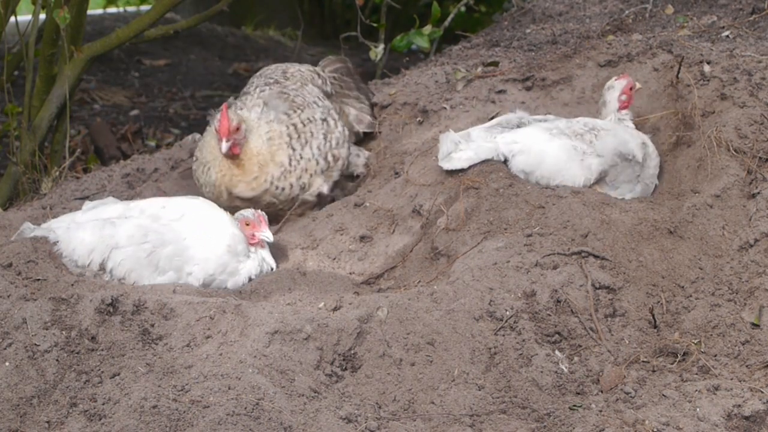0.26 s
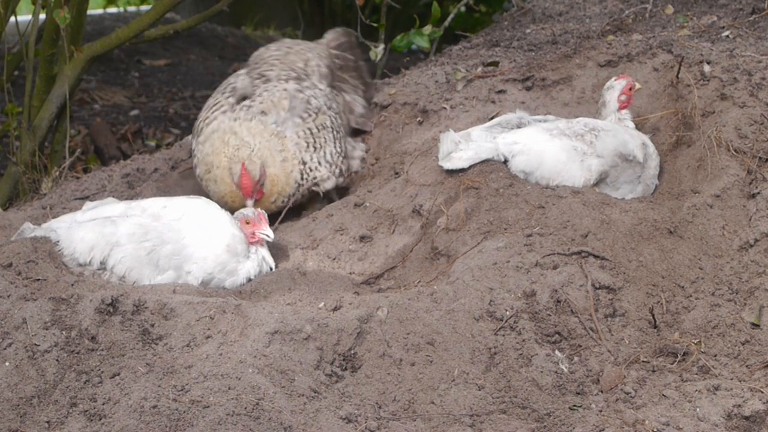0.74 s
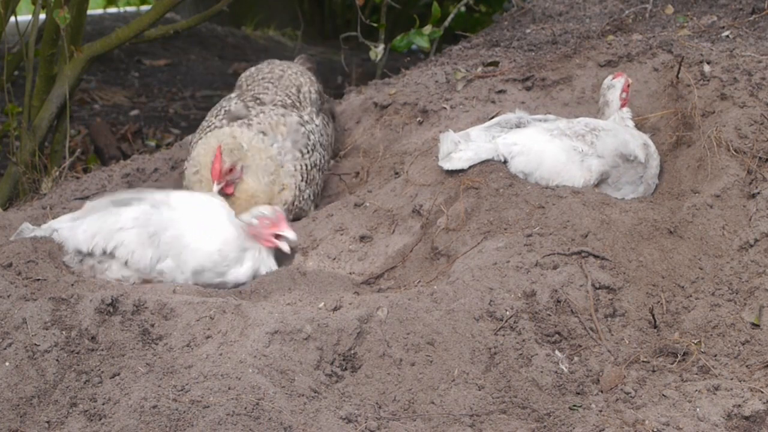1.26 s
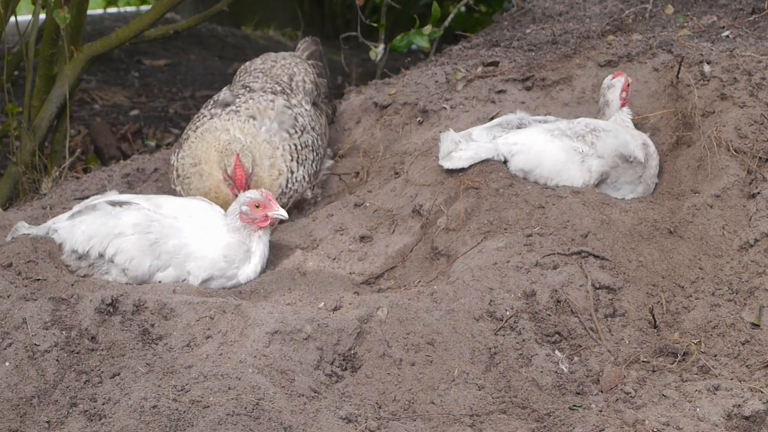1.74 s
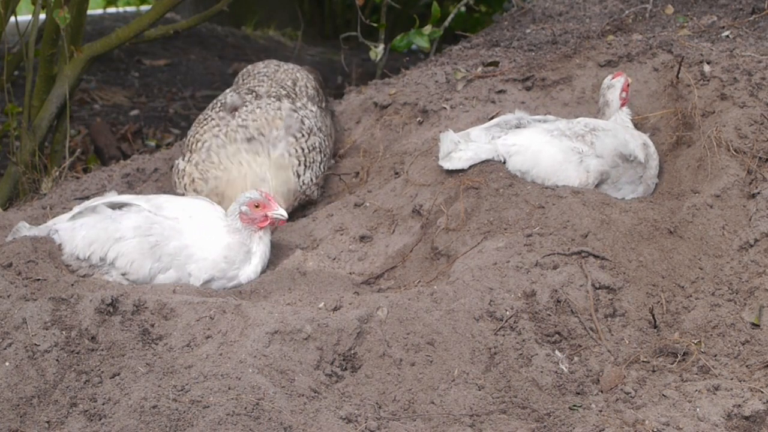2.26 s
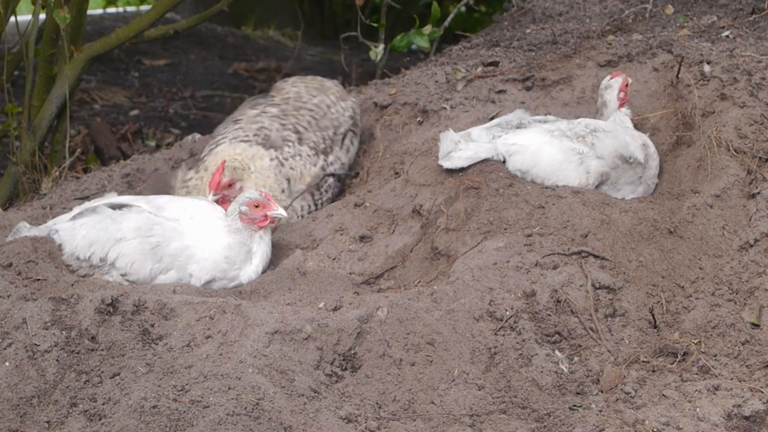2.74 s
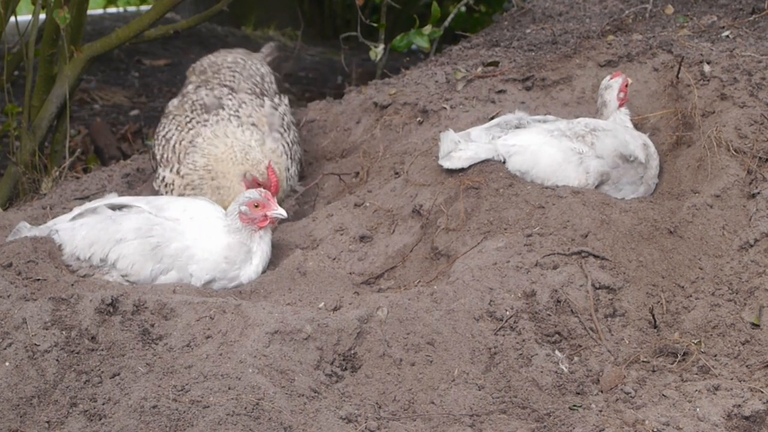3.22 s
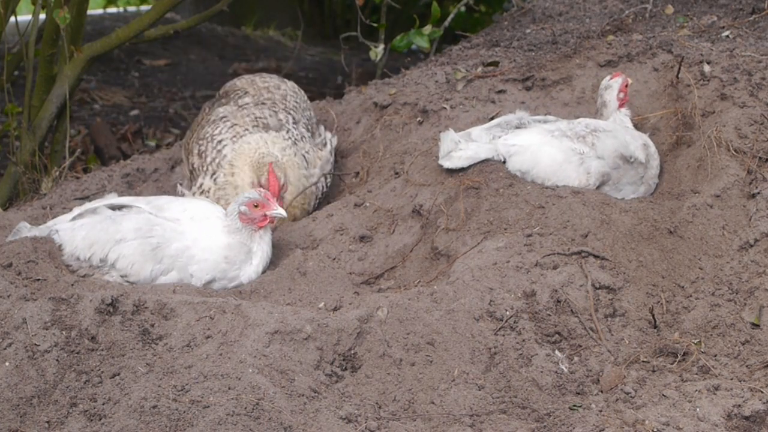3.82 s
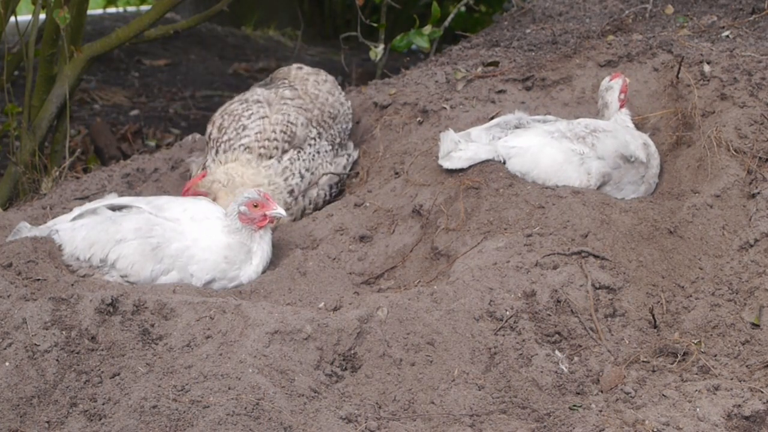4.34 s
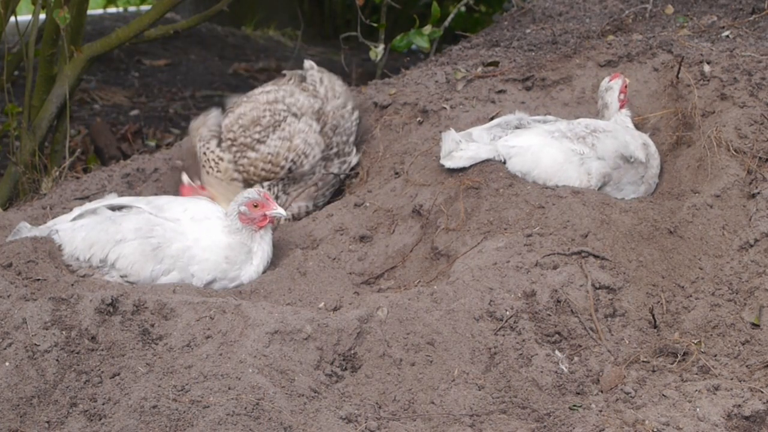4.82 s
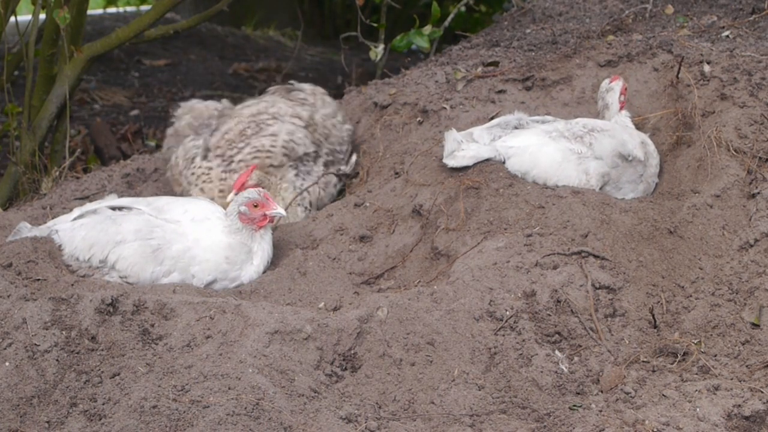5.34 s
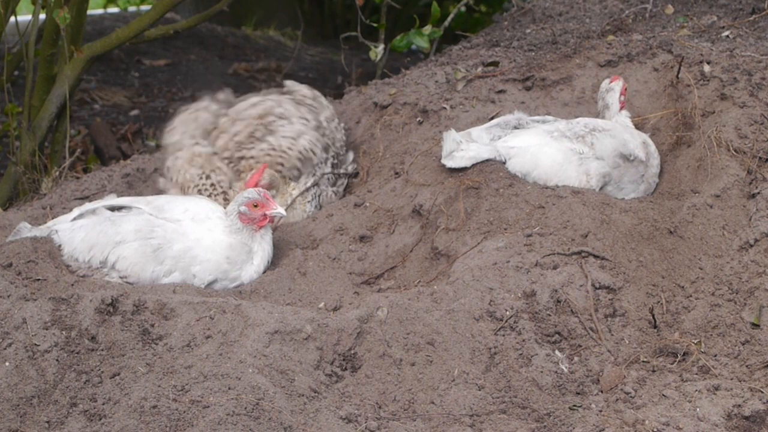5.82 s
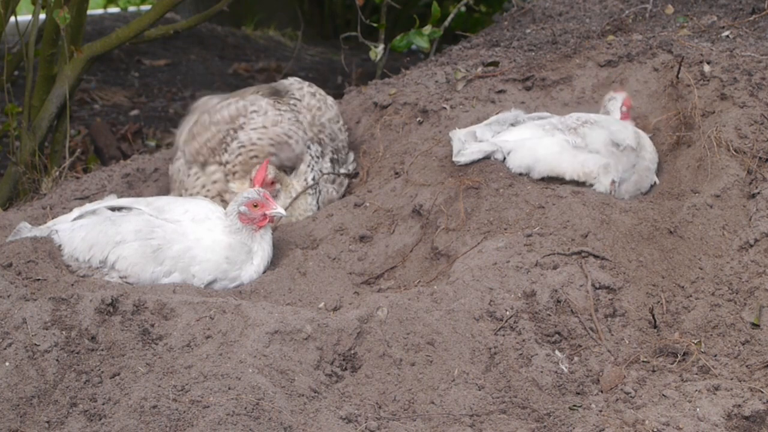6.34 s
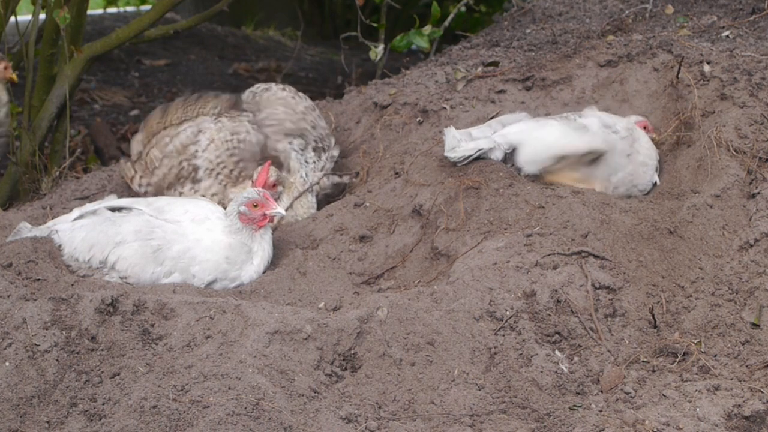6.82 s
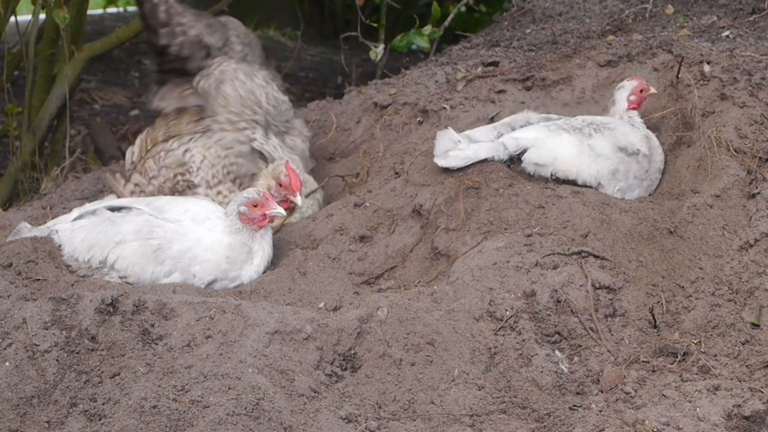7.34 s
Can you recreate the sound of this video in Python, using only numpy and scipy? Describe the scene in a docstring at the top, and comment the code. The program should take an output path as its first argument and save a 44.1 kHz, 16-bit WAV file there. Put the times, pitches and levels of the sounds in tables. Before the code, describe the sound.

A hen croons and mutters while another bird yelps, whistles and screams once; later come quiet clucking, sandy rustles and a short rough squawk.

```python
"""A sandy poultry run outdoors: birds dust-bathe close by, under a faint hiss of air.
A hen croons and clucks low; a shriller bird yelps, flips into thin whistles and screams once.
Later comes a hoarse squawk. Feathers shuffle in the sand and a far bird calls in falling notes.
Calls are harmonics plus breath noise shaped by a throat; air and sand are filtered noise.
Echoes and a scattered tail place the sounds in the yard."""
import sys
import numpy as np
from scipy import signal
from scipy.fft import rfft, irfft, next_fast_len
from scipy.io import wavfile
from scipy.ndimage import uniform_filter1d, minimum_filter1d

SR = 44100
rng = np.random.default_rng(int(sys.argv[2]) if len(sys.argv) > 2 else 0)


def master(y):
    """Save y as 16-bit WAV."""
    cut = np.clip(np.atleast_2d(y).T, -1, 1)
    pcm = np.round(cut * 32767)  # scale
    wavfile.write(sys.argv[1], SR, pcm.astype(np.int16))


N = 333837  # samples
EDGE_HZ = 15650  # top of the audible band
EDGE_DB = 10  # a held call starts and ends this far below its level
BREAK_S = 0.0013697  # time scale of a break between registers


def amp(db):
    """Decibels to gain."""
    return 10 ** (np.asarray(db) / 20)


def unit(x):
    """Scales to rms 1."""
    return x / np.sqrt(np.mean(x ** 2) + 1e-20)


def read(points, hz):
    """Reads a (frequency_hz, value) table on a log-frequency axis."""
    table_hz, value = np.transpose(points)
    return np.interp(np.log(hz + 1), np.log(table_hz + 1), value)


def add(mix, start_s, sound):
    """Mixes a sound in at its start time."""
    part = mix[max(round(start_s * SR), 0):][:len(sound)]
    part += sound[:len(part)]


def tint(x, points):
    """Filters by a (frequency_hz, gain_db) table."""
    size = next_fast_len(len(x) + 1024)
    gain = amp(read(points, np.fft.rfftfreq(size, 1 / SR)))
    return irfft(rfft(x, size) * gain, size)[:len(x)]


def wander(count, hz):
    """Smooth random drift of rms 1, changing about hz times a second."""
    pole = np.exp(-2 * np.pi * hz / SR)
    noise = rng.standard_normal(count + 2048)
    return unit(signal.lfilter([1], np.poly([pole, pole]), noise)[-count:])


def timeline(first_s, last_s, count=240):
    """Evenly spaced moments."""
    return np.linspace(first_s, last_s, count)


def blend(a, b, share):
    """Goes from a to b as share goes from 0 to 1."""
    return a + (b - a) * share


def contour(s, hz, db, rough):
    """The controls of one call, as rows of (time_s, pitch_hz, level_db, roughness)."""
    return np.column_stack(np.broadcast_arrays(s, hz, db, rough))


def held(t, length_s, attack_s, release_s):
    """Attack, hold and release as an envelope in dB."""
    attack = np.maximum(1 - t / attack_s, 0)
    release = np.maximum(1 - (length_s - t) / release_s, 0)
    return -EDGE_DB * (attack + release)


def broken(t):
    """How far (0-1) the voice has moved into its other register, t seconds from the break."""
    return .5 + .5 * np.tanh(t / (2 * BREAK_S))


def note(start_s, length_s, first_hz, last_hz, db, rough, attack_s, release_s):
    """A held note whose pitch glides in a straight line."""
    t = timeline(0, length_s)
    hz = blend(first_hz, last_hz, t / length_s)
    return contour(start_s + t, hz, db + held(t, length_s, attack_s, release_s), rough)


def throat_response(points, size=4096):
    """Complex response of a throat: its gain, with the phase of a causal ring."""
    log_gain = np.log(amp(read(points, abs(np.fft.fftfreq(size, 1 / SR)))))
    response = np.exp(np.conj(signal.hilbert(log_gain)))
    return np.fft.rfftfreq(size, 1 / SR), response[:size // 2 + 1]


def call(rows, throat, tilt_db, jitter, doubling, rasp, smear, count):
    """A syrinx sounds through a throat; roughness adds jitter, period doubling and a rasp."""
    s, *columns = np.transpose(rows)
    s = np.maximum.accumulate(s)
    t = np.arange(s[0], s[-1] + 0.002508, 1 / SR)
    hz, db, rough = (uniform_filter1d(np.interp(t, s, column), size=64) for column in columns)
    rough = np.clip(rough, 0, 1)
    waver = .006 + jitter * rough
    turns = np.cumsum(hz * (1 + waver * wander(len(t), hz=148.05))) / SR

    # strong and weak cycles alternate, which puts half lines between the harmonics
    k = np.arange(1, 2 * count + 1)[:, None] / 2
    half_lines = doubling * rough * np.minimum(k, 1) ** 3
    strength = amp(tilt_db * abs(np.log2(k))) * np.where(k % 1, half_lines, 1)
    # the shape of the cycle keeps changing, so each partial flutters on its own
    flutter = np.array([wander(len(t), hz=56.14) for _ in k])
    strength = strength * amp((1.5 + 4 * rough) * flutter)
    partials = strength * np.interp(k * hz, *throat_response(throat)) * (k * hz < EDGE_HZ)

    # smear spreads each pulse over its cycle
    phase = 2 * np.pi * k * turns + smear * k ** 2
    tone_rms = np.sqrt((abs(partials) ** 2).sum(0) / 2)
    tone = (partials * np.exp(1j * phase)).real.sum(0) / tone_rms
    tone *= amp(2.873 * rough * wander(len(t), hz=106.6))

    # breath noise puffs once a cycle; half the voice's tilt per octave shapes it above 2 kHz
    breath_table = [(f, gain + tilt_db / 2 * np.log2(max(f / 2000, 1))) for f, gain in throat]
    puff = 1.144 + np.exp(-(turns % 1) / 0.3033)
    breath = unit(tint(puff * rng.standard_normal(len(t)), breath_table))
    share = np.clip(rasp * rough ** 2, 0, 1)
    fade = np.clip(np.minimum(t - t[0], t[-1] - t) / .002, 0, 1)
    return s[0], amp(db) * fade * (np.sqrt(1 - share) * tone + np.sqrt(share) * breath)


def voice(calls, throat, gain_db, **syrinx):
    """All the calls made with one setting of throat and syrinx."""
    out = np.zeros(N)
    for rows in calls:
        add(out, *call(rows, throat, **syrinx))
    return amp(gain_db) * out


AIR_DB = -42.5  # rms of the whole wash
TREBLE_HZ = 10908  # the treble ride counts in full above this, less and less below
# colour of the outdoor air: frequency_hz, relative_density_db (per Hz)
AIR_COLOUR = [(25, -32), (50, -18.5), (100, -12), (160, -12), (250, -8.5), (390, -1), (630, -1.5),
              (1000, 2), (1350, -1.5), (2000, -6), (5000, -8.5), (8000, -14.5), (12500, -26.5),
              (15500, -33)]
# left-right likeness of the air: frequency_hz, likeness (0-1)
AIR_LIKENESS = [(60, 0.383), (130, 0.8442), (290, 0.97965), (640, 0.0989), (1410, 0.0667), (3100, 0.019),
                (6820, 0.2485), (15000, 0.2733)]
# phase by which the right side lags: frequency_hz, lag_rad
AIR_LAG = [(0, 2), (340, -0.9367), (950, -0.2194), (1550, 4), (2150, 7), (4820, 1.5), (5770, 1.5),
           (7150, 1.0234), (11700, 1.5), (14600, 1.5), (15200, 2.5)]
# slow ride of the air's treble: time_s, relative_level_db
AIR_TREBLE_RIDE = [(0, -0.5), (1.1, 0), (2.0, 2), (3.3, 1.5), (4.2, 1), (5.3, -2.5), (6.3, 0), (7.57, 2.5)]


def air(patchy_db=1.041):
    """A distant wash of noise with drifting patches, partly shared between left and right."""
    frames, hz = N // 256 + 5, np.fft.rfftfreq(1024, 1 / SR)
    a, b, c, d, patches = rng.standard_normal((5, frames, len(hz)))
    patches = uniform_filter1d(patches, size=14, axis=0)
    patches = unit(uniform_filter1d(patches, size=10, axis=1))
    same = np.clip(read(AIR_LIKENESS, hz), -1, 1)
    left = a + 1j * b
    right = same * left + np.sqrt(1 - same ** 2) * (c + 1j * d)
    right = right * np.exp(-1j * read(AIR_LAG, hz))
    ride_db = np.interp(np.arange(frames) * 256 / SR, *np.transpose(AIR_TREBLE_RIDE))
    treble_db = ride_db[:, None] * np.minimum(hz / TREBLE_HZ, 1)
    field = np.array([left, right]) * amp(read(AIR_COLOUR, hz) + patchy_db * patches + treble_db)
    wash = signal.istft(field, nperseg=1024, noverlap=768, time_axis=-2, freq_axis=-1)[1]
    return unit(wash[:, :N]) * amp(AIR_DB)


# feathers and feet shuffling in sand: middle_s, length_s, level_db (before the swell)
SAND_SHUFFLES = [(2.413, 0.083, -52), (4.069, 0.0742, -49.5), (5.712, 0.11, -47), (6.399, 0.3485, -52),
                 (7.196, .1, -51), (7.326, 0.04889, -45), (7.557, 0.09614, -47)]
# colour of the sand: frequency_hz, relative_gain_db
SAND_COLOUR = [(150, -2.5), (400, 3), (1000, 3.5), (1600, -39), (3000, -4), (5000, -5.5), (8000, -14.5),
               (15000, -29)]


def shuffles(grain_db=5.5):
    """Each shuffle is a soft swell of sand grains of uneven size."""
    out = np.zeros(N)
    for middle_s, length_s, db in SAND_SHUFFLES:
        count = int(length_s * SR)
        size = np.minimum(rng.exponential(1, count), 5)
        grains = rng.standard_normal(count) * amp(grain_db * size)
        swell = np.hanning(count)
        add(out, middle_s - length_s / 2, amp(db) * unit(tint(grains, SAND_COLOUR)) * swell)
    return out


# a far bird's falling notes: start_s, length_s, first_pitch_hz, last_pitch_hz, level_db
FAR_NOTES = [(3.169, .115, 6480, 6200, -56), (3.324, 0.12, 6710, 5485, -56.5),
             (3.48, 0.11, 5608, 5015, -60.5)]


def far_bird():
    """A far bird's held notes: one partial each, gliding down."""
    notes = [note(*row, rough=0.1097, attack_s=0.02843, release_s=0.0465) for row in FAR_NOTES]
    return voice(notes, YELP_THROAT_GAIN, gain_db=0.0, tilt_db=-20,
                 jitter=0.05127, doubling=0, rasp=0, smear=0, count=1)


CROON_ATTACK_S, CROON_RELEASE_S = 0.009265, 0.01963


def warble(db, curve):
    """A long croon holds its level while the pitch wavers."""
    s, hz, rough = np.transpose(np.array(curve))
    t = timeline(s[0], s[-1])
    level = db + held(t - s[0], s[-1] - s[0], CROON_ATTACK_S, CROON_RELEASE_S)
    return contour(t, np.interp(t, s, hz), level, np.interp(t, s, rough))


# Call levels in the tables below are before each voice's gain_db.
# long, wavering croons: level_db, curve of (time_s, pitch_hz, roughness 0-1)
LONG_CROONS = [ (-34, [(-.01, 205, .2), (.05, 242, .05), (.09, 228, .04), (.15, 240, .05), (.2, 275, .4),
               (.222, 268, .5)]), (-31, [(.432, 168, .5), (.458, 201, .35), (.485, 200, .18),
               (.503, 177, .36), (.555, 184, .3), (.59, 210, .42)]), (-32.5, [(2.856, 209, .45),
               (2.912, 240, .5), (2.94, 197, .42), (2.985, 255, .12), (3.008, 271, .1), (3.04, 210, .2),
               (3.072, 247, .17), (3.125, 205, .5), (3.175, 197, .33)])]
# short croons and mutters:
# start_s, length_s, first_pitch_hz, last_pitch_hz, level_db, roughness (0-1)
SHORT_CROONS = [(0.41, 0.03365, 170, 164.6, -35, .55), (1.204, 0.05364, 200.3, 185, -33.5, 0.47),
                (1.261, 0.14, 179.8, 170.5, -39, 0.6), (1.606, 0.02716, 189.2, 178.5, -40, 0.34),
                (1.631, 0.11112, 175.5, 161.3, -38.5, 0.36), (1.707, 0.0555, 495.8, 479.1, -39.5, 0.16),
                (1.836, 0.07391, 190.8, 199.3, -40.5, 0.46), (3.161, 0.087555, 200.7, 221.6, -35, 0.46),
                (3.239, 0.04663, 222.4, 223.4, -39, 0.31), (3.268, .062, 230.6, 223.3, -32, 0),
                (4.828, 0.0307, 403.1, 383.5, -43.5, 0.25), (5.479, 0.03343, 382.1, 376, -44, 0.12),
                (6.445, 0.1435, 218.6, 216.1, -52, 0.53), (6.949, 0.0605, 216.6, 222.4, -44.5, 0.55)]
# throat and beak when crooning: frequency_hz, relative_gain_db
CROON_THROAT_GAIN = [(130, -29), (220, -16.5), (305, -0.5), (380, 5), (470, 6), (620, 5.5), (800, 8),
                     (890, -10), (1010, 9), (1180, -9), (1450, -16), (2200, -28), (5000, -51)]


def croons():
    """The hen's low croons: long wavering ones and short gliding ones through one throat."""
    calls = [warble(*row) for row in LONG_CROONS]
    calls += [note(*row, CROON_ATTACK_S, CROON_RELEASE_S) for row in SHORT_CROONS]
    return voice(calls, CROON_THROAT_GAIN, gain_db=0.163, tilt_db=0.2772,
                 jitter=.09, doubling=.8, rasp=.45, smear=.4, count=14)


CLUCK_FALL_S, CLUCK_DEPTH_DB = 0.02469, 18.5
CLUCK_ARCH = 0.03531  # share of the pitch lost at the ends
CLUCK_EDGE_ROUGH = .42


def cluck(peak_s, rise_s, hz, db, rough, roundness=0.9667):
    """A soft cluck is highest and loudest at its peak; its roughness shifts toward the ends."""
    t = timeline(-rise_s, CLUCK_FALL_S)
    edge = np.maximum(-t / rise_s, t / CLUCK_FALL_S) ** roundness
    pitch = hz * (1 - CLUCK_ARCH * edge)
    level = db - CLUCK_DEPTH_DB * edge
    return contour(peak_s + t, pitch, level, blend(rough, CLUCK_EDGE_ROUGH, edge))


# a run of soft clucks: peak_s, rise_s, peak_pitch_hz, peak_level_db, roughness (0-1, at the peak)
SOFT_CLUCKS = [(5.823, .011, 188.3, -27.5, 0.38), (5.906, 0.02277, 296.9, -27, 0.2),
               (5.995, 0.0342, 299, -29, 0.2), (6.078, .017, 343.9, -25, 0.17),
               (6.195, 0.016975, 302.6, -26.5, 0.65)]
# throat and beak when clucking: frequency_hz, relative_gain_db
CLUCK_THROAT_GAIN = [(150, -13), (230, -40), (320, 6.5), (600, 4.5), (740, 6), (900, 6), (1050, 8),
                     (1220, -11.5), (1460, -3.5), (1900, -19.5), (3000, -20), (6000, -41)]


def clucks():
    """A run of soft clucks: short arched pulses of voice through the throat."""
    return voice([cluck(*row) for row in SOFT_CLUCKS], CLUCK_THROAT_GAIN, gain_db=0.1765,
                 tilt_db=-0.55, jitter=.09, doubling=.6, rasp=.7, smear=.4, count=12)


THROB_HZ, THROB_DB, FIRST_THROB_S = 53.28, -0.5, 0.0063
SQUAWK_DB, SQUAWK_SWELL_DB = -25.5, 8.5  # level once swollen, before throb and gain; growth
SQUAWK_ATTACK_S, SQUAWK_RELEASE_S = 0.0034, 0.01887
# roughness of the squawk (0-1): first, last
SQUAWK_ROUGHNESS = (.5, .95)


def hoarse(start_s, length_s, first_hz, last_hz):
    """A squawk swells and roughens as its pitch sags, throbbing all the way."""
    t = timeline(0, length_s)
    share = t / length_s
    throb = THROB_DB * np.cos(2 * np.pi * THROB_HZ * (t - FIRST_THROB_S))
    level = SQUAWK_DB - SQUAWK_SWELL_DB * (1 - share) ** 2 + throb
    level = level + held(t, length_s, SQUAWK_ATTACK_S, SQUAWK_RELEASE_S)
    pitch = blend(first_hz, last_hz, share)
    return contour(start_s + t, pitch, level, blend(*SQUAWK_ROUGHNESS, share))


# the one hoarse squawk: start_s, length_s, first_pitch_hz, last_pitch_hz
HOARSE_SQUAWK = (7.037, .122, 730, 665)
# throat and beak when squawking: frequency_hz, relative_gain_db
SQUAWK_THROAT_GAIN = [(250, -48.5), (540, -2.5), (780, 5), (1030, -2), (1400, 4.5), (1800, -7),
                      (2350, -6.5), (3000, -15), (4500, -20), (5600, -23.5), (8000, -35), (14000, -38)]


def squawk():
    """A hoarse squawk: strong period doubling and breath noise in a sagging voice."""
    return voice([hoarse(*HOARSE_SQUAWK)], SQUAWK_THROAT_GAIN, gain_db=-0.5, tilt_db=2.495,
                 jitter=.07, doubling=.85, rasp=.7, smear=.5, count=14)


WHISTLE_ROUGH, FLIP_ROUGH = .06, .27  # in a steady whistle, and while its register flips
# a whistle flips down into a loud, pure yip and back: middle_s, length_s, pitch_hz, level_db
YIP_FLIPS = [(.073, .011, 1434, -22), (0.093, .017, 1448, -19), (0.106, .008, 1434, -33),
             (0.5711, .016, 1821, -9), (0.593, .0125, 1835, -8), (0.613, .008, 2007, -23.5),
             (0.9238, .011, 1712, -12), (0.9427, .015, 1671, -12)]


def whistle(curve, pitch_edge=4.208, level_edge=2.0636):
    """A thin whistle; each yip pulls its pitch down and its level up, and the flips are rough."""
    s, hz, db = np.transpose(np.array(curve))
    t = timeline(s[0], s[-1])
    hz, db, rough = np.interp(t, s, hz), np.interp(t, s, db), WHISTLE_ROUGH
    for middle_s, length_s, yip_hz, yip_db in YIP_FLIPS:
        away = abs(t - middle_s) / (length_s / 2)
        low, loud = np.exp(-away ** pitch_edge), np.exp(-away ** level_edge)
        hz, db = blend(hz, yip_hz, low), blend(db, yip_db, loud)
        flip = np.sin(np.pi * np.sqrt(loud)) ** 2
        rough = rough * (1 - loud) + FLIP_ROUGH * flip
    return contour(t, hz, db, rough)


SAG_PER_S = 4.6  # rate of the exponential pitch sag
SQUEAK_ROUGH, SQUEAK_RISE_DB = 0.08344, 37.5
CLUCK_FADE_DB, CLUCK_PEAK = 29.5, 0.39376  # the cluck's level curve peaks at this share of its length
BREAK_KICK_DB, BREAK_ROUGH = 1.5, 0.1685  # the break itself is a rough little knock


def squeak_cluck(break_s, squeak_s, cluck_s, squeak_hz, cluck_hz, squeak_db, cluck_db, rough):
    """A clean squeak swells as it sags, then breaks with a knock into a low, rough cluck."""
    t = timeline(-squeak_s, cluck_s)
    low = broken(t)
    knock = np.exp(-((t - BREAK_S) / BREAK_S) ** 2)
    hz = squeak_hz * (cluck_hz / squeak_hz) ** low * np.exp(-SAG_PER_S * t)
    swell = squeak_db - SQUEAK_RISE_DB * (np.minimum(t, 0) / squeak_s) ** 2
    from_peak = (np.maximum(t, 0) / cluck_s - CLUCK_PEAK) / (1 - CLUCK_PEAK)
    fade = cluck_db - CLUCK_FADE_DB * from_peak ** 2
    level = blend(swell, fade, low) + BREAK_KICK_DB * knock
    return contour(break_s + t, hz, level, blend(SQUEAK_ROUGH, rough, low) + BREAK_ROUGH * knock)


HONK_RISE_HZ_PER_S, HONK_ROUGH = 2300.4, 0.05076
RASP_PITCH, RASP_DB, RASP_ROUGH = 0.87, -9, 0.7997  # pitch and level are relative to the honk


def honk(start_s, rasp_s, honk_s, release_s, hz, db):
    """A low rasp breaks upward into a clear, rising tone."""
    t = timeline(0, rasp_s + honk_s)
    clear = broken(t - rasp_s)
    rising_hz = hz + HONK_RISE_HZ_PER_S * (t - rasp_s)
    pitch = blend(RASP_PITCH * hz, rising_hz, clear)
    level = db + RASP_DB * (1 - clear) + held(t, rasp_s + honk_s, BREAK_S, release_s)
    return contour(start_s + t, pitch, level, blend(RASP_ROUGH, HONK_ROUGH, clear))


# thin whistles, one curve each: time_s, pitch_hz, level_db (before the yips)
THIN_WHISTLES = [
    [(.064, 2038, -52.5), (.082, 2444, -40), (.116, 1634, -45.5)],
    [(.515, 2780, -51), (.555, 2690, -40.5), (.58, 2904, -33), (.603, 3011, -34.5), (.62, 2780, -32.5),
     (.642, 2913, -33.5), (.688, 2731, -30.5), (.702, 2493, -38), (.716, 2303, -41)],
    [(.863, 2164, -27), (.872, 2722, -39), (.888, 2651, -34), (.908, 2787, -38.5), (.93, 2716, -37.5),
     (.954, 2061, -41.5)],
]
# a falling squeak breaks down into a cluck: break_s, squeak_length_s, cluck_length_s,
# squeak_pitch_hz, cluck_pitch_hz (both before the sag), squeak_level_db, cluck_level_db,
# roughness (0-1, of the cluck before the knock)
BREAKING_SQUEAKS = [(.325, 0.01657, 0.027787, 1552, 918, -30, -20.5, 0.23),
                    (0.7225, .01, 0.024906, 1787, 501.8, -18.5, -19, 0.33),
                    (.989, 0.0054, 0.01174, 1486, 388.8, -41.5, -28.5, 0.34),
                    (1.7671, .03, 0.019604, 1426, 428.9, -18.5, -23.5, 0.27),
                    (3.124, .012, 0.02314, 870.4, 830.3, -40.5, -26.5, 0.14)]
# a rasp clears into a honk that leads up to a whistle or the scream:
# start_s, rasp_length_s, honk_length_s, release_s, pitch_hz (before the rise), level_db
RASPING_HONKS = [(.833, .014, 0.020457, 0.00594, 974.4, -21), (1.258, 0.017, 0.040434, 0.02464, 992.4, -20)]
# throat and beak when yelping: frequency_hz, relative_gain_db
YELP_THROAT_GAIN = [(200, -21), (450, -7.5), (700, 6.5), (1000, 4), (1300, 7.5), (1850, 13), (2300, -8.5),
                    (2900, -3.5), (3700, -6.5), (4700, -5.5), (5700, -8.5), (7000, -17), (8500, -7),
                    (11300, -9.5), (15000, -32.5)]


def yelps():
    """The shrill bird's whistles, breaking squeaks and honks, from a steeply tilted syrinx."""
    calls = [whistle(curve) for curve in THIN_WHISTLES]
    calls += [squeak_cluck(*row) for row in BREAKING_SQUEAKS]
    calls += [honk(*row) for row in RASPING_HONKS]
    return voice(calls, YELP_THROAT_GAIN, gain_db=-0.4949, tilt_db=-9.5,
                 jitter=.08, doubling=.8, rasp=1.5, smear=.1, count=12)


# the scream, a rising whistle and then its outburst over an octave lower, one curve each:
# time_s, pitch_hz, level_db, roughness (0-1)
SCREAM_CURVES = [
    [(1.298, 2378, -32.5, 0.14), (1.321, 2820, -28, 0.06), (1.336, 3125, -20.5, 0.07),
     (1.343, 3146, -18, 0.29), (1.368, 3293, -14.5, 0.29), (1.372, 2828, -13, 0.39)],
    [(1.368, 1046, -6, 0.86), (1.381, 1024, -1.5, .8), (1.392, 994, -5, 0.13), (1.415, 967.3, -11.5, 0.19),
     (1.426, 933.1, -12, 0.27), (1.437, 943.1, -15, 0.71), (1.462, 978.8, -24, 0.81)],
]
# throat and beak when screaming: frequency_hz, relative_gain_db
SCREAM_THROAT_GAIN = [(500, -47), (980, -11), (1400, -11), (2000, 4.5), (2250, 10.5), (2550, -2),
                      (3100, -3.5), (4000, -0.5), (4850, 1), (5900, -3), (6700, -17.5), (7900, -9.5),
                      (9700, -8), (13200, -18.5), (14600, -55)]


def scream():
    """A rising whistle bursts into a low, rough cry with more harmonics."""
    rise, outburst = SCREAM_CURVES
    whistling = voice([rise], SCREAM_THROAT_GAIN, gain_db=-1.5817, tilt_db=-5,
                      jitter=.035, doubling=1.6, rasp=1.2, smear=.4, count=5)
    crying = voice([outburst], SCREAM_THROAT_GAIN, gain_db=3.4645, tilt_db=-4,
                   jitter=.09, doubling=.8, rasp=.45, smear=.6, count=14)
    return whistling + crying


# decay of the yard's scatter: frequency_hz, t60_s
YARD_DECAY = [(200, 0.419), (1000, 0.2853), (2000, 0.3541), (5000, 0.29963), (9000, 0.3662),
              (14000, 0.2825)]
# colour of the scatter: frequency_hz, relative_gain_db
YARD_COLOUR = [(200, -46), (1000, 14), (2000, 0.5), (4000, 17), (8000, 15), (14000, -20.5)]


def yard(x, build_s=0.01397, spread=0.619):
    """Scatter from trees and fence: sparse taps, each band dying at its own speed."""
    taps = rng.standard_normal((2, SR)) * (rng.random((2, SR)) < 2500 / SR)
    hz, t, bands = signal.stft(taps, SR, nperseg=256)
    decay_db = -60 * t / read(YARD_DECAY, hz)[:, None]
    build = 1 - np.exp(-t / build_s)
    bands = bands * amp(read(YARD_COLOUR, hz)[:, None] + decay_db) * build
    mid, side = signal.istft(bands, SR, nperseg=256)[1]
    tail = np.array([mid + spread * side, mid - spread * side])
    return signal.fftconvolve(x[None], tail / np.linalg.norm(tail[0]), axes=1)[:, :N]


# left and right differ more toward the treble: frequency_hz, difference_db
SIDE_COLOUR = [(300, -50.5), (1000, -20), (2000, -20), (4000, -9.5), (8000, -7.5), (13000, -6.5)]
# echoes off ground and fence: delay_s, left_level_db, right_level_db
FIRST_ECHOES = [(.0031, -16, -47.5), (0.0099, -23, -13), (0.017, -13, -15), (.034, -36.5, -18.5),
                (0.051, -25, -26)]


def echoes(x):
    """The direct sound on the left and right and its first distinct reflections."""
    side = np.zeros(N)
    add(side, .0004, tint(x, SIDE_COLOUR))  # a slightly late difference signal
    out = np.array([x + side, x - side])
    for delay_s, *sides_db in FIRST_ECHOES:
        for ear, db in zip(out, sides_db):
            add(ear, delay_s, amp(db) * x)
    return out


def scene():
    """The birds in their yard, over the air."""
    sand_and_far = shuffles() + far_bird()
    low_voices = croons() + clucks() + squawk()
    shrill, screaming = yelps(), scream()
    direct = shrill + screaming + low_voices + sand_and_far
    scattered = amp(-14) * shrill + amp(-13) * (screaming + low_voices) + amp(-5) * sand_and_far
    return echoes(direct) + yard(scattered) + air()


def record(dry):
    """A limiter holds down the loudest peaks and lets go gradually; then the band limit."""
    over_db = np.maximum(20 * np.log10(abs(dry).max(0) / .94 + 1e-9), 0)
    release = np.arange(N) * 42 / SR  # 42 dB a second
    held_db = np.maximum.accumulate(over_db + release) - release
    gain_db = uniform_filter1d(minimum_filter1d(-held_db, size=129), size=129)
    low_pass = signal.firwin(511, EDGE_HZ, window=("kaiser", 9), fs=SR)
    return signal.oaconvolve(dry * amp(gain_db), low_pass[None], "same")


dry = scene()
out = record(dry)
master(out)
```